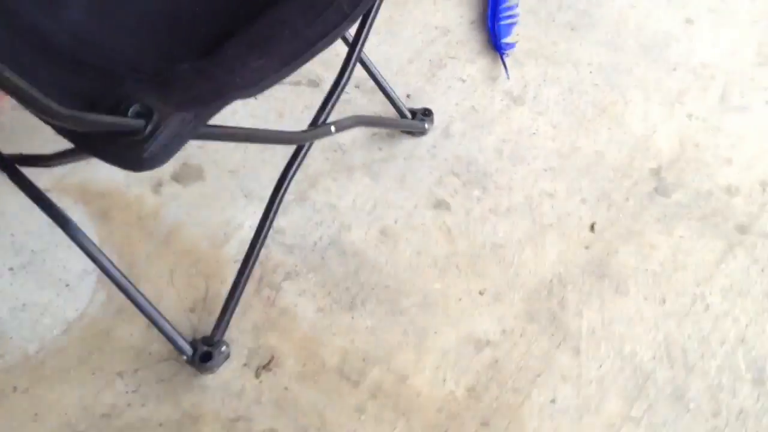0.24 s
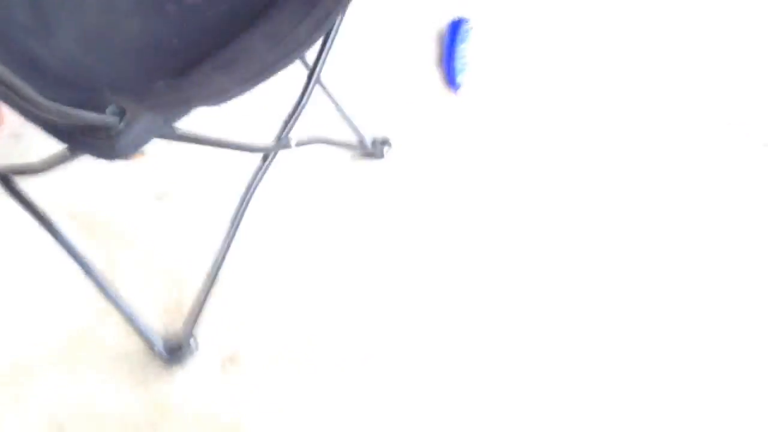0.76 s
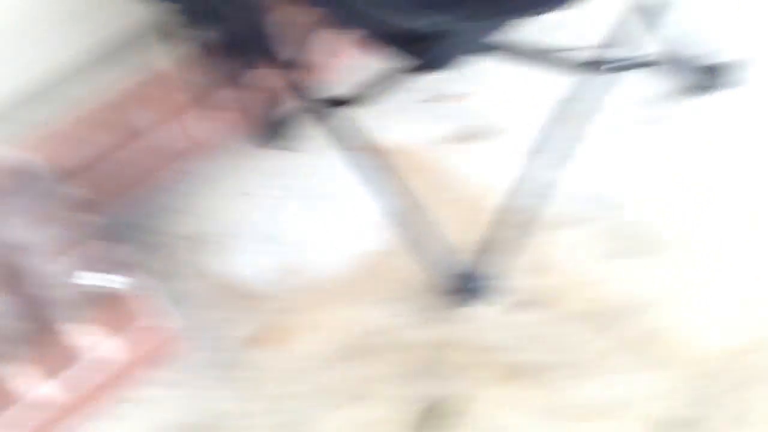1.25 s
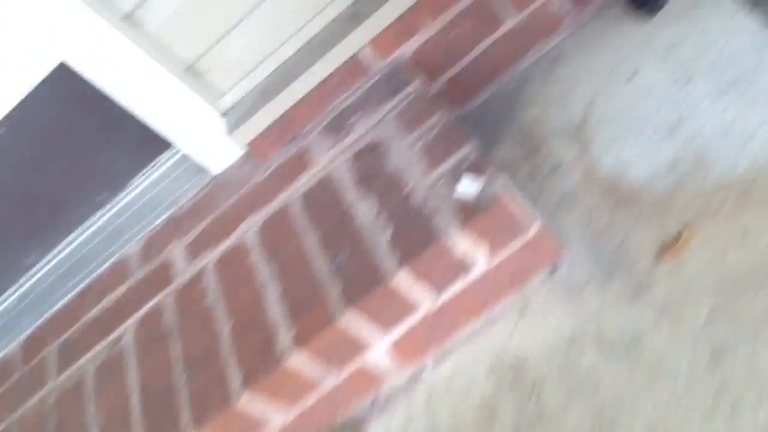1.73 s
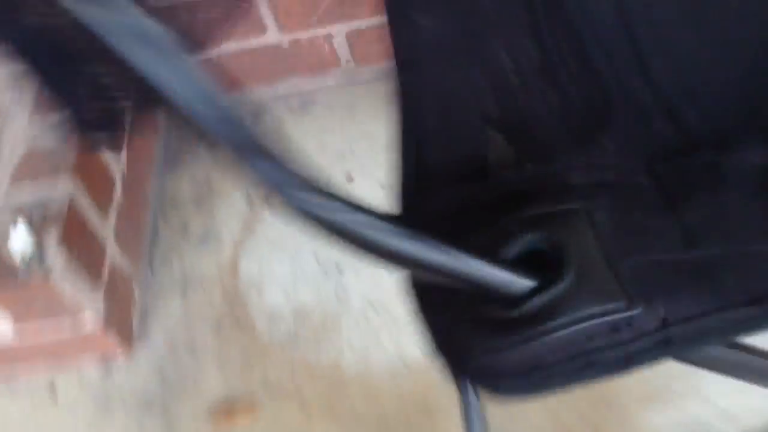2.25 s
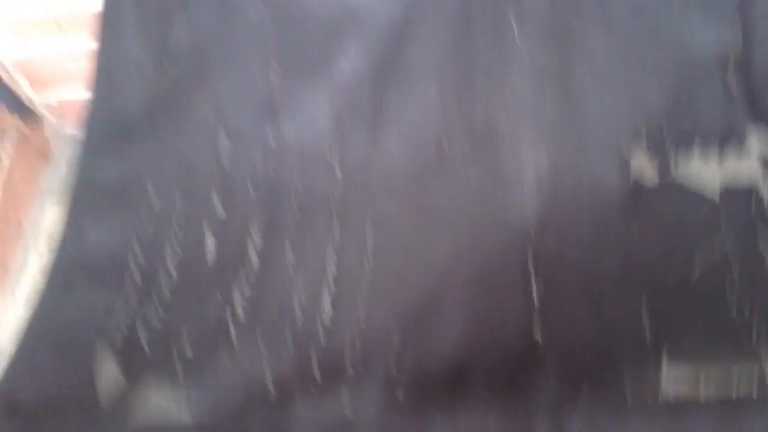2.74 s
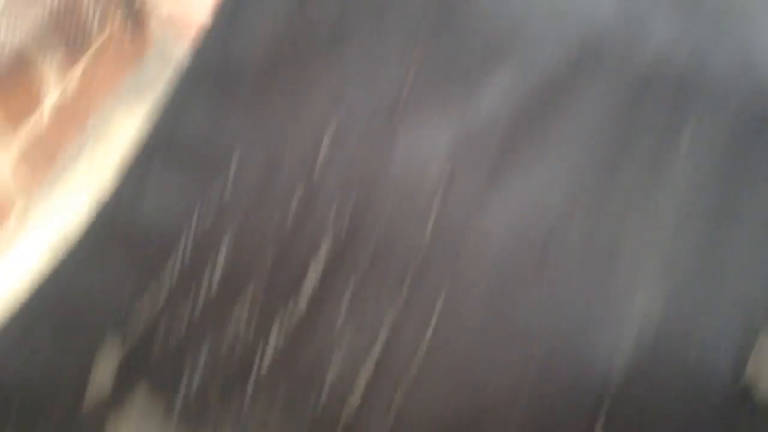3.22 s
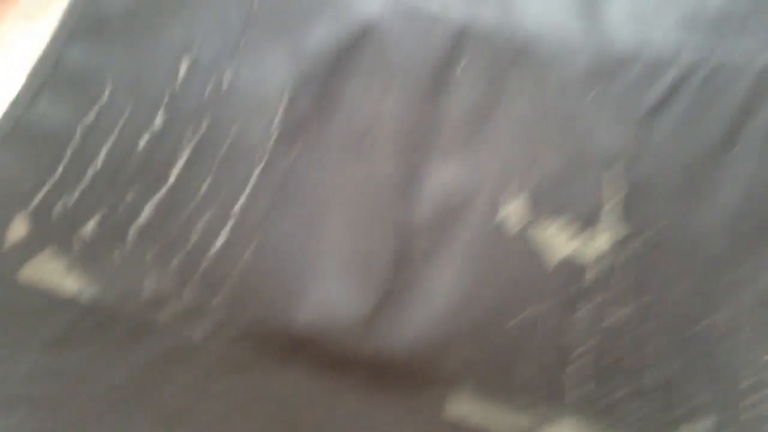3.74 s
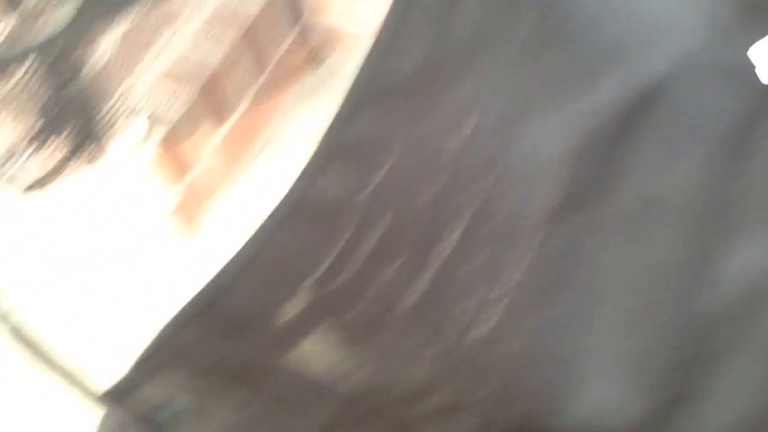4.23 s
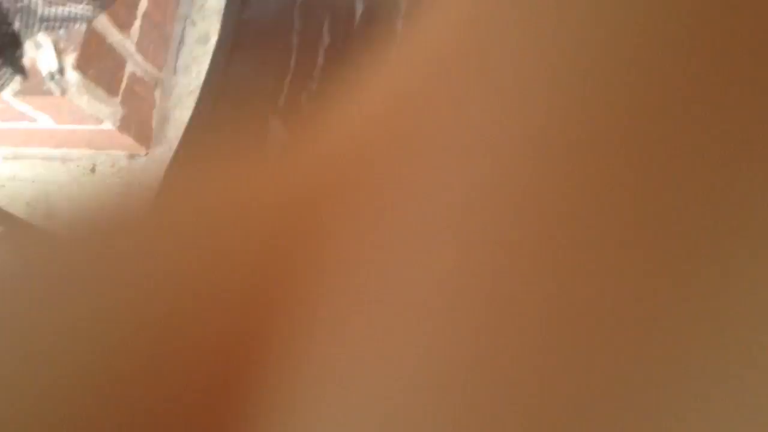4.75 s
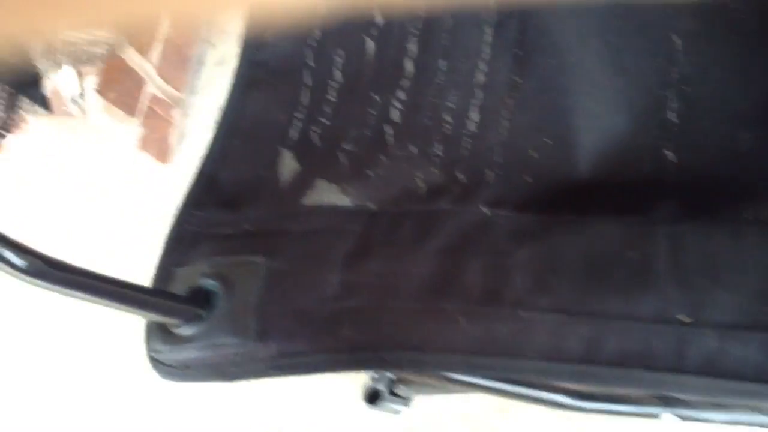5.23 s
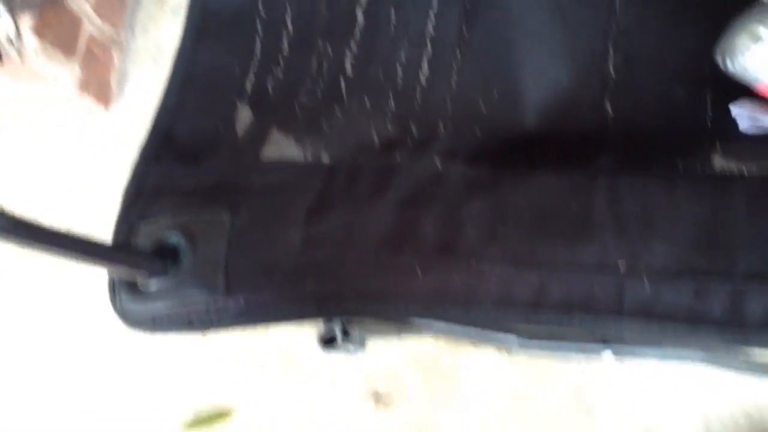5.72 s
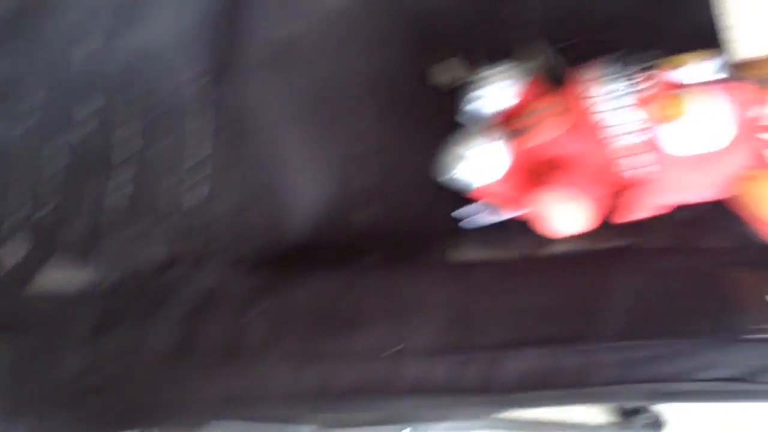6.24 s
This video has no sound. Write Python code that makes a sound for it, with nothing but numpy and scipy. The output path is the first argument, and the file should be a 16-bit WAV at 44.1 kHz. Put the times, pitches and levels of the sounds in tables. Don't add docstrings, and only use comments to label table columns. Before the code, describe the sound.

Hard, overloaded cracks and thumps as a handheld device knocks against a folding chair on a porch, with cloth rubs and faint outdoor hush.

```python
import sys
import numpy as np
from scipy import signal
from scipy.io import wavfile
from scipy.ndimage import uniform_filter1d

SR = 44100
rng = np.random.default_rng(int(sys.argv[2]) if len(sys.argv) > 2 else 0)


def decibels_to_gain(level_db):
    exponent = np.asarray(level_db, float) / 20
    return 10 ** exponent


def output_pcm(signal):
    pcm = np.clip(np.atleast_2d(signal).T, -1, 1) * 32767
    wavfile.write(sys.argv[1], SR, np.round(pcm).astype(np.int16))


N = 285755


def band(x, lo_hz, hi_hz, order=2):
    return signal.sosfilt(signal.butter(order, [lo_hz, min(hi_hz, .45 * SR)], "band", fs=SR, output="sos"), x)


def unit(x):
    return x / np.sqrt(np.mean(x ** 2))


def walk(rate, size):
    hold = int(SR / rate)
    steps = np.repeat(rng.standard_normal(size // hold + 1), hold)
    return 1.2 * uniform_filter1d(steps, hold)[:size]


def fade(ms, held_ms, t60_ms):
    return decibels_to_gain(-60 * np.maximum(ms - held_ms, 0) / max(t60_ms, 1))


def add(out, x, s):
    i = int(s * SR)
    out[i:i + len(x)] += x[:N - i]


def colour(spectrum, hz):
    f, db = np.transpose(spectrum)
    return np.interp(np.log(hz), np.log(f), db) + 10 * np.log10(hz / 1000)


LOW_CUT_HZ = 143


def low_cut(x):
    steep = signal.sosfilt(signal.butter(5, LOW_CUT_HZ, "high", fs=SR, output="sos"), x)
    return steep + decibels_to_gain(-31.5) * band(x, 29, 160, order=1)


EDGE_DB, EDGE_DB_PER_MS = -5, -12.5
EDGE_NARROW, EDGE_AT = 2.3, 2.47


def contact(ms, contact_ms):
    u = ms / contact_ms
    swell = np.exp(-.5 * (u - 3) ** 2)
    edge = np.exp(-.5 * (EDGE_NARROW * (u - EDGE_AT)) ** 2)
    return swell + decibels_to_gain(EDGE_DB + EDGE_DB_PER_MS * contact_ms) * edge


# pitch in Hz, level in dB per Hz
HUSH = [(35, -53), (60, -18), (268, -4), (330, -10.5), (469, 1.5), (515, -8), (841, -9.5), (1010, -10),
        (1410, -12.5), (1860, -15.5), (3930, -18.5), (13900, -24), (16000, -29)]
# time in seconds, level in dB
BREEZE = [(0.0, -50), (0.68, -50.5), (1.21, -50.5), (1.57, -50.5), (2.0, -47.5), (2.2, -49), (2.99, -47.5),
          (3.68, -50.5), (4.87, -49.5), (5.85, -52), (6.03, -53.5), (6.48, -54)]
# pitch in Hz, width in Hz, level in dB
HAND_CAVITY = [
    (3200, 450, 1),
    (2500, 1850, 2),
    (5000, 700, -3),
]
# start in seconds, end in seconds
HAND_S = (4.95, 5.82)
# time in seconds, level in dB
GRIP = [(0.0, -63), (0.56, -54), (0.79, -43), (0.97, -48), (1.21, -73), (1.57, -59), (2.0, -85.5),
        (2.2, -63), (2.51, -54), (2.62, -69), (3.39, -61), (3.52, -52.5), (3.68, -71.5), (4.48, -50),
        (4.87, -51), (5.14, -48.5), (6.03, -42.5), (6.4, -55)]
PORCH_DB, PORCH_T60_S = -21, 0.4


def outdoors():
    t = np.arange(N) / SR
    wash = np.zeros(N)
    for s, seat_db, *_ in BLOWS:
        wash += (t > s) * decibels_to_gain(seat_db + PORCH_DB - 60 * abs(t - s) / PORCH_T60_S)
    hush = np.zeros(N)
    for hz in 90 * 2 ** np.arange(0, 7.6, .5):
        noise = unit(band(rng.standard_normal(N), hz / 1.19, hz * 1.19))
        hush += decibels_to_gain(colour(HUSH, hz) + 1.0 * walk(11, N)) * noise
    cupped = np.interp(t, [HAND_S[0], HAND_S[0] + 0.071, HAND_S[1], HAND_S[1] + .03], [0, 0.6, 1.37, 0])
    cavity = np.zeros(N)
    for hz, width, db in HAND_CAVITY:
        cavity += decibels_to_gain(db) * unit(band(rng.standard_normal(N), hz - width / 2, hz + width / 2))
    level = np.hypot(decibels_to_gain(np.interp(t, *np.transpose(BREEZE)) - 5.5), wash)
    air = level * (unit(hush) + cupped * decibels_to_gain(-10.5) * cavity)
    patter = (rng.random(N) < 600 / SR) * rng.standard_normal(N) * decibels_to_gain(4.0 * walk(28, N))
    rumble = unit(low_cut(band(patter, 40, 160)))
    return air + decibels_to_gain(np.interp(t, *np.transpose(GRIP)) - 5.0) * rumble


# time in seconds, level in dB, contrast of its colour (1 = full)
RUBS = [
    [(0.69, -70, 0.65), (0.712, -41, 1.0), (0.77, -43.5, 0.85), (0.84, -68, 1.0)],
    [(2.13, -24, 0.82), (2.136, -54, 0.85), (2.144, -45, 0.83), (2.198, -45, 0.72), (2.25, -63, 0.62)],
    [(2.5, -45.5, 0.65), (2.57, -48.5, 0.99), (2.638, -49, 1.0), (2.74, -44, 0.7), (2.79, -44.5, 0.95),
     (2.854, -40, 0.92), (2.915, -43.5, 0.29), (2.964, -62, 0.78), (2.98, -53, 0.94)],
]
# pitch in Hz, level in dB per Hz
WEAVES = [
    [(710, -45), (1200, -21), (1480, -1), (2570, -3), (2770, 5), (4500, 5.5), (6440, -9), (9620, -1),
     (15000, -28)],
    [(350, -44), (600, -29), (734, -6), (923, -20), (1480, -3), (1910, -15), (5840, -11.5), (13800, -26),
     (15000, -22)],
    [(410, -37), (700, -18), (1380, -8), (2250, -1.5), (4100, 7), (5400, 3.5), (6500, -14), (8600, 2),
     (11000, -7), (15000, -33)],
]
FLICKER_DB = 1.8


def cloth():
    out, bands = np.zeros(N), 600 * 2 ** np.arange(0, 4.7, 1 / 3)
    for stroke, weave in zip(RUBS, WEAVES):
        s, db, contrast = np.transpose(stroke)
        contrast = contrast + 0.05 * np.minimum(max(db) - db, 12)
        t = np.arange(s[0], s[-1], 1 / SR)
        shade_db = colour(weave, bands) - colour(weave, bands).max()
        ticks = decibels_to_gain(1.4 * walk(500, len(t)))
        fibres = np.zeros(len(t))
        for hz, shade in zip(bands, shade_db):
            slips = band(ticks * rng.standard_normal(len(t)), hz / 1.096, hz * 1.07, order=1)
            level_db = shade * np.interp(t, s, contrast) + FLICKER_DB * walk(27.8, len(t))
            fibres += decibels_to_gain(level_db) * unit(slips)
        ends = signal.windows.tukey(len(t), .15)
        add(out, decibels_to_gain(np.interp(t, s, db)) * ends * unit(fibres), s[0])
    return out


# start in seconds, then taut seat, leg tubes, back tube and arm tube in dB
BLOWS = [
    (2.378, -17, -31, -55.5, -57),
    (3.349, -8, -27, -34, -31.5),
    (4.2992, -16, -39, -48, -31),
]
# pitch in Hz, level in dB, time to fall 60 dB in seconds
CHAIR = [
    [(274, -0.5, .15), (412.6, -5, 0.071), (537, -30, 0.02)],
    [(270, 0, .62), (281, -6, .3), (225, -10, .3)],
    [(803, -2.5, 0.5), (1141, -6, 0.18)],
    [(862, -3, 0.4), (398, 4, .18), (470, 0, .2)],
]
WOBBLE_DB = 1.8


def chair():
    out, t = np.zeros(N), np.arange(SR // 2) / SR
    for s, *part_db in BLOWS:
        ring = np.zeros(len(t))
        for db, part in zip(part_db, CHAIR):
            for hz, tone_db, t60 in part:
                wobble = WOBBLE_DB * walk(38, len(t)) * np.minimum(t / 0.061, 1)
                ring += decibels_to_gain(db + tone_db - 60 * t / t60 + wobble) * np.sin(2 * np.pi * hz * t)
        add(out, ring, s)
    return low_cut(out)


# start in seconds, rms level in dB, centre in Hz
TICKS = [(0.619, -24, 4000), (0.623, 0.5, 4994), (0.632, -11, 5000), (0.636, -19, 5070),
         (0.875, -15.5, 2500), (0.8805, -19.5, 4000), (0.8923, -14.5, 2270), (0.923, -44.5, 5010),
         (.926, -49, 1700), (0.66, -44, 1500), (.939, -51, 1383), (2.1245, -41.5, 1273), (2.3738, -9, 4570),
         (2.672, -43, 4050), (3.355, -21, 2500), (4.276, -61, 1500), (4.301, -26, 7300),
         (3.304, -40.5, 8500), (4.309, -46, 5000), (4.343, -35.5, 3474), (4.663, -49, 11000),
         (5.052, -51.5, 6500), (5.192, -44, 6000), (5.24, -39.5, 7130), (5.448, -52, 2930),
         (5.711, -38, 780), (5.878, -20.5, 4000), (5.987, -48.5, 6000), (6.171, -47, 3480),
         (1.6852, -44, 6060), (1.687, -46, 1800), (1.806, -40.5, 1500), (1.936, -41, 5000),
         (.175, -47, 1600), (2.799, -48, 4500), (5.89, -42, 5000)]
TICK_HELD_MS, TICK_T60_MS, CONTACT_RISE_MS = .8, 6, 1.2
# start in seconds, rms level in dB, time to fall 60 dB in ms, centre in Hz
CLICKS = [(.066, -44.5, 67, 1620), (.067, -49.5, 100, 640), (5.882, -52.5, 70, 4000),
          (0.441, -51, 6.2, 1193), (0.884, -20.5, 36, 1980), (1.623, -50.5, 20, 2960),
          (1.685, -44, 27, 8100), (1.702, -43, 37, 10800), (1.807, -52, 16, 7460), (1.936, -47.5, 46, 6940),
          (2.057, -46.5, 13, 1300), (2.485, -50.5, 140, 8550), (2.98, -51, 26, 4300), (2.37, -21, 80, 1530),
          (2.537, -44.5, 67, 10100), (3.041, -48, 31, 3000), (3.3478, -16.5, 44, 6070),
          (3.442, -40.5, 110, 11900), (4.162, -50, 36, 8100), (5.401, -40.5, 20, 2580),
          (5.825, -12, 15, 4460), (5.882, -30.5, 40, 850), (6.099, -57, 22, 2040), (6.37, -54.5, 25, 891)]
CLICK_HELD_MS = 3.7
# start in seconds, rms level in dB, held in ms,
# time to fall 60 dB in ms, centre in Hz
SCRAPES = [(.624, -26, 18, 38, 5640), (.902, -45, 33, 60, 1107), (3.2036, -39, 31, 72, 3560),
           (3.204, -37.5, 6.7, 400, 9000), (4.749, -51.5, 82, 50, 9900), (4.855, -20.5, 7, 120, 5050),
           (4.858, -12, 58, 97.5, 1420), (4.872, -33.5, 42, 64, 5980), (5.832, -22, 51, 4.4, 1612),
           (5.9085, -14, 10.1, 8, 2804), (5.922, -48, 7.8, 12, 1600)]
SCRAPE_RISE = 0.055
# peak time in seconds, rms level in dB, rise in ms,
# time to fall 60 dB in ms, centre in Hz
BRUSHES = [
    (1.691, -53, 63, 350, 9050),
    (4.849, -4.5, 37.7, 30, 4615),
    (6.173, -56, 150, 68, 6110),
    (0.201, -59.5, 330, 350, 3460),
    (1.85, -57.5, 190, 900, 2560),
    (1.96, -62, 200, 650, 2600),
    (4.297, -47, 32, 30, 7000),
]
# level under the seat in dB, time to fall 60 dB in ms, centre in Hz
RATTLE = [
    (-22, 257, 850),
    (-36.5, 275, 9400),
    (-25, 180, 13000),
]
RATTLE_LAG_S = 0.0081
LOOSE_DB = (7, -2.5, -2)


def crack_rows():
    rows = [(s, db, CONTACT_RISE_MS, TICK_HELD_MS, TICK_T60_MS, hz) for s, db, hz in TICKS]
    rows += [(s, db, CONTACT_RISE_MS, CLICK_HELD_MS, t60, hz) for s, db, t60, hz in CLICKS]
    rows += [(s, db, SCRAPE_RISE * held, held, t60, hz) for s, db, held, t60, hz in SCRAPES]
    rows += [(s, db, rise, CLICK_HELD_MS, t60, hz) for s, db, rise, t60, hz in BRUSHES]
    for (s, seat_db, *_), loose_db in zip(BLOWS, LOOSE_DB):
        for db, t60, hz in RATTLE:
            rows.append((s + RATTLE_LAG_S, seat_db + loose_db + db, CONTACT_RISE_MS, CLICK_HELD_MS, t60, hz))
    return rows


GRIT_DB, SMOOTH_MS = 4.6, 45
RING_MS = 22


def cracks():
    out, lead = np.zeros(N), SR // 16
    for s, db, rise_ms, held_ms, t60_ms, hz in crack_rows():
        noise = rng.standard_normal(SR // 3)
        uneven = walk(900, SR // 3) * min(1, SMOOTH_MS / (rise_ms + held_ms + t60_ms))
        size = min(SR // 3, lead + int((held_ms + t60_ms) * SR / 1000))
        ms = (np.arange(size) - lead) * 1000 / SR
        grit = (noise * decibels_to_gain(GRIT_DB * uneven))[:size]
        broad = band(band(grit, hz / 5.6, hz * 1.09, order=1), 83, hz * 4.0, order=1)
        narrow = band(grit, hz / 1.6, hz * 1.31)
        faint = np.clip((-35.5 - db) / 12, 0, 1) * min(1, t60_ms / RING_MS)
        tone = (1 - faint) * unit(broad) + faint * unit(narrow)
        envelope = fade(-ms, 0, rise_ms) * fade(ms, held_ms, t60_ms)
        add(out, decibels_to_gain(db) * envelope * unit(tone), s - lead / SR)
    return out


# start in seconds, peak level in dB, contact in ms
PRESSES = [(0.6556, -8, 0.7), (0.6602, -19, 0.47), (0.673, -8, 0.39), (0.6858, -17, 0.43),
           (0.6938, -29, 0.42), (0.7495, -18.5, 0.9), (0.9084, -4.5, 0.5), (0.9228, -13, 0.54),
           (0.9324, -28, 0.35), (0.9405, -24, 0.74), (4.9052, -8, 0.34), (4.9222, -6.5, 0.29),
           (4.931, -8.5, 0.27), (4.938, -13, 0.44), (5.8584, -4.5, 0.85), (5.8677, 0.5, 0.52),
           (5.9, -26.5, 0.9), (0.8796, 3, 0.67), (4.3003, -16, 0.47), (.6267, 3.5, 0.15),
           (0.628, -0.5, 0.36), (0.6313, -2.5, 0.35), (0.6372, -2, 0.24), (0.89, -1, .12),
           (4.3074, -6.5, 0.23), (4.3107, -8, 0.15), (6.05, -42, 0.46)]
# start in seconds, peak level in dB, contact in ms
RECOILS = [(0.6801, -19, 0.57), (0.7022, -14.5, 0.58), (0.7251, -19, 0.49), (0.785, -23, 0.54),
           (.799, -23.5, 0.57), (0.861, -24, 0.71), (0.8977, -18, 0.56), (0.906, -9.5, 0.43),
           (0.9153, -6, 0.71), (0.9358, -10.5, 0.61), (0.952, -27, 0.63), (0.9624, -24.5, 0.7),
           (5.8731, -4, 0.67), (5.8785, 3.5, 0.43), (5.9186, -4.5, 0.88), (5.928, -31, 1),
           (5.9344, -28, 0.42), (5.9891, -24, 0.97), (0.6222, 3.5, 0.35), (0.885, -5.5, 0.18),
           (0.886, 5, 0.43), (4.8619, -1, 0.64), (4.8657, 5, 0.41), (4.8683, 2, 0.41), (4.8722, 1.5, 0.36),
           (4.8747, -2, 0.32), (4.8817, -1, 0.31), (4.887, -4.5, .45), (4.8922, -5.5, 0.23),
           (5.8238, 4.5, 0.362), (6.0139, -38.5, 0.61), (6.0763, -32, 0.96), (6.1679, -28, 0.85),
           (6.343, -33.5, 0.81)]


def thumps():
    out, ms = np.zeros(N), np.arange(SR // 25) * 1000 / SR
    for way, rows in ((-0.77, PRESSES), (0.78, RECOILS)):
        for s, db, contact_ms in rows:
            wavelet = low_cut(contact(ms, max(contact_ms, .1)))
            add(out, way * decibels_to_gain(db) * wavelet / np.max(abs(wavelet)), s)
    return out


# start in seconds, peak level in dB, held in ms,
# time to fall 60 dB in ms, contact in ms
KNOCKS = [(.441, -29, 0.11, 63, 0.515), (0.6246, -7, 5, 31, 0.2), (0.675, -19, 0.072, 64, 0.31),
          (.8748, -13.5, 4.8, 9.6, 0.25), (0.882, -11.5, 3, 40, 0.27), (2.3693, -12, 16, 26, 0.166),
          (2.379, -13.5, 0.1, 106, 0.55), (3.213, -35, 7.4, 160, 0.46), (3.348, 1, 0.094, 62, 0.162),
          (3.436, -16.5, 0.17, 3.6, 0.17), (4.295, -24, 11, 11, 0.176), (4.3007, -27, 9.9, 9.9, 0.37),
          (4.3061, -24, 7.6, 45, 0.204), (4.85, 2, 15, 14, 0.11), (4.861, -1, 41, 120, 0.27),
          (5.824, -8, 0.19, 31, 0.25), (5.838, -8, 27, 23, 0.14), (5.859, -11, 3.7, 11, 0.25),
          (5.867, -15, 6.2, 6, 0.27), (5.877, -3.5, 1.7, 2.6, 0.16), (5.9075, 5, 7.9, 3.9, 0.28),
          (5.913, -3, 3.6, 4.6, 0.36)]
# start in seconds, peak level in dB,
# time to fall 60 dB in ms, contact in ms
SHAKES = [(0.165, -44, 34, 0.86), (0.32, -40.5, 30, 1), (0.653, -16.5, 90, 0.74), (0.689, -17.5, 102, 0.48),
          (0.729, -26.5, 240, 0.53), (0.789, -27.5, 96, 0.67), (0.813, -29, 22, 0.67),
          (0.834, -32.5, 94, 0.57), (0.865, -29, 61, 0.74), (.897, -11, 81, 0.24), (.914, -18, 34, 0.46),
          (0.9255, -9.5, 61, 0.28), (0.954, -27.5, 87, 0.523), (0.974, -32.5, 90, 0.77),
          (1.17, -45, 58, 0.93), (2.49, -27, 60, 0.63), (2.498, -24.5, 40, 0.56), (4.278, -24.5, 38, 0.24),
          (4.317, -22.5, 160, 0.2), (4.343, -20, 41, 0.33), (4.366, -37, 50, 0.16),
          (4.785, -36.5, 130, 0.97), (5.192, -43.5, 48, 0.25), (5.24, -28.5, 4.9, 0.35),
          (5.402, -22, 5.4, 0.22), (5.934, -36, 13, 0.29), (5.988, -31.5, 9.3, 0.31),
          (6.17, -39, 7.3, 0.21), (6.37, -41, 50, 0.24)]
SHAKE_HOLD = 0.069
# start in seconds, peak level in dB, held in ms
SHIFTS = [(0.067, -45.5, 26), (.403, -47, .1), (0.466, -34, 24), (0.553, -48, .1), (0.573, -38, .1),
          (.587, -49, 4), (0.607, -40, 11), (1.06, -49.5, 23), (2.54, -37, 11), (2.618, -75, 23),
          (4.621, -57, 0.061), (4.71, -36.5, 3), (4.742, -40, 19), (4.991, -41.5, 66), (5.146, -45, 36),
          (5.213, -37.5, 26), (5.316, -35, 7.8), (5.38, -39, 9.8), (5.423, -33, 46), (5.518, -33.5, 51),
          (5.61, -42.5, 61), (5.661, -41, 0.11), (5.696, -37.5, 18), (5.734, -40, 1.16), (6.031, -38, 89),
          (6.345, -41, 7.8), (6.456, -40, 16.5)]
SHIFT_T60_MS, SHIFT_LINGER, SHIFT_CONTACT_MS = 11, .7, .75
# start in seconds, peak level in dB, contact in ms
TAPS = [
    (6.0879, -24.5, 1.0),
    (6.1054, -21, 0.99),
    (6.1266, -22, 1),
    (6.1538, -20.5, 1.0),
    (6.2244, -15, 0.73),
    (6.3266, -15, 0.83),
]
TAP_HELD_MS, TAP_T60_MS = .1, 1


def jolt_rows():
    rows = list(KNOCKS)
    rows += [(s, db, SHAKE_HOLD * t60, t60, contact_ms) for s, db, t60, contact_ms in SHAKES]
    rows += [(s, db, held, SHIFT_T60_MS + SHIFT_LINGER * held, SHIFT_CONTACT_MS) for s, db, held in SHIFTS]
    rows += [(s, db, TAP_HELD_MS, TAP_T60_MS, contact_ms) for s, db, contact_ms in TAPS]
    return sorted(rows)


JOLT_GAP_MS = 1.3


def jolts():
    out, size = np.zeros(N), SR // 4
    rows = jolt_rows()
    chance = rng.random((len(rows), 3, 80))
    for (s, db, held_ms, t60_ms, contact_ms), (gap, strength, turn) in zip(rows, chance):
        ms = np.cumsum((JOLT_GAP_MS + 1.5 * contact_ms) * (.55 + .9 * gap))
        ms = ms - ms[0]
        swing = np.cumprod(np.where(turn < .7, -1, 1))
        rebounds = -swing * swing[0] * (.15 + .85 * strength)
        force = np.r_[-1, rebounds[1:]] * fade(ms, held_ms, t60_ms)
        train = np.zeros(size)
        np.add.at(train, np.minimum(ms * SR / 1000, size - 1).astype(int), force)
        push_ms = np.arange(SR // 100) * 1000 / SR
        push = signal.fftconvolve(train, contact(push_ms, contact_ms))[:size]
        train[0] *= .15
        sharp = np.exp(-.5 * (2.05 * push_ms / contact_ms - 4) ** 2)
        edge = signal.fftconvolve(train * abs(train), sharp)[:size]
        jolt = low_cut(push + decibels_to_gain(0.5 - 17 * contact_ms) * edge)
        add(out, decibels_to_gain(db) * jolt / np.max(abs(jolt)), s)
    return out


def scene():
    return (outdoors() + cloth() + chair() + cracks() + thumps() + jolts())[None]


def roll_off(x):
    return signal.sosfilt(signal.butter(12, 16130, fs=SR, output="sos"), x)


TOP_HZ = 15250
OVERLOAD, HEADROOM = 2.5, 1.06


def record(dry):
    dull = signal.sosfilt(signal.butter(1, 11000, fs=SR, output="sos"), dry)
    flat = dull / (1 + abs(dull) ** (2 * OVERLOAD)) ** (.5 / OVERLOAD)
    flat = flat + decibels_to_gain(2.5) * band(abs(dull) - abs(flat), 28, 160, order=1)
    cut = signal.sosfilt(signal.ellip(8, .2, 60, TOP_HZ, fs=SR, output="sos"), flat)
    return roll_off(np.clip(HEADROOM * cut, -1, 1))


dry = scene()
out = record(dry)
output_pcm(out)
```